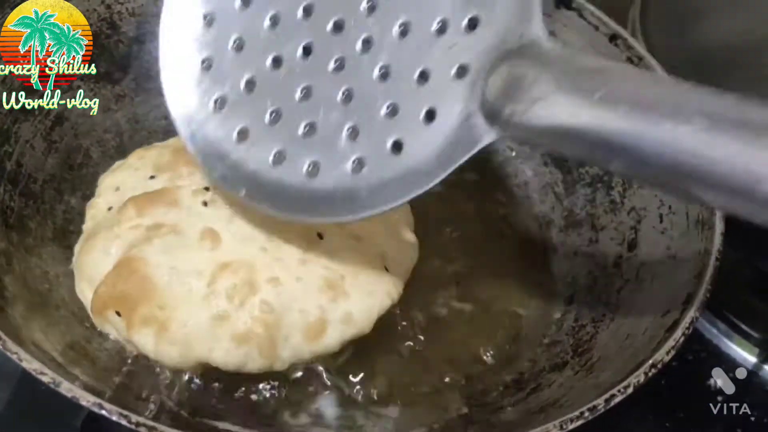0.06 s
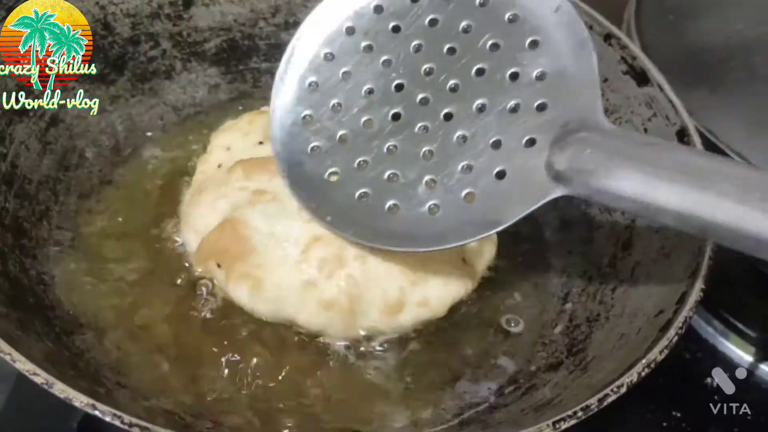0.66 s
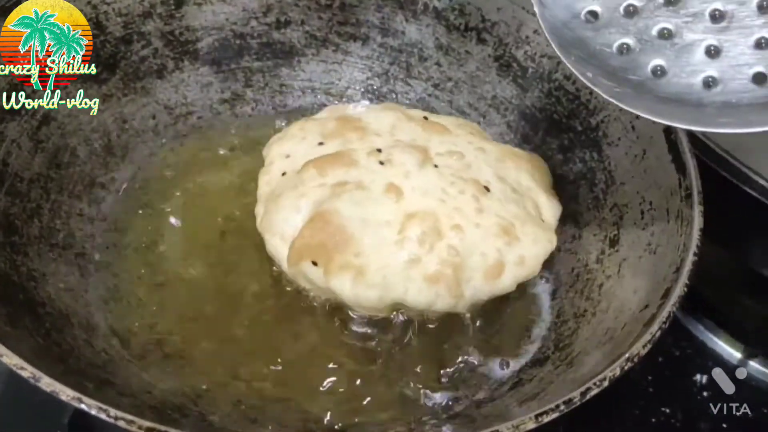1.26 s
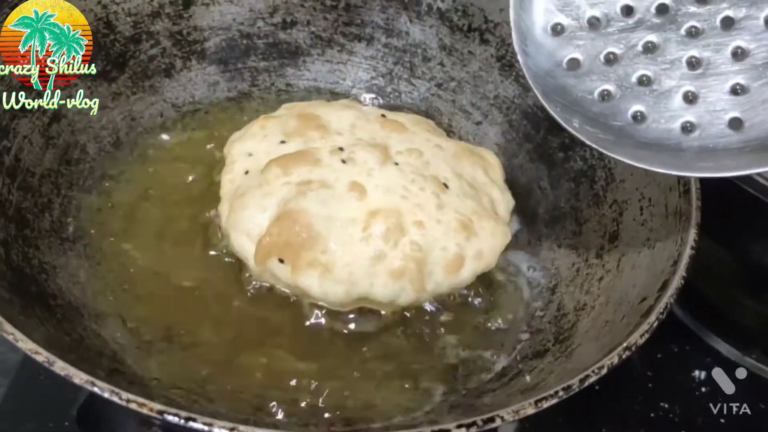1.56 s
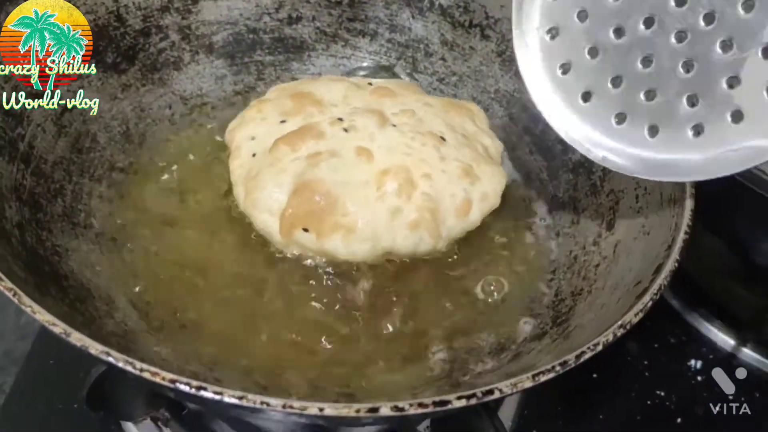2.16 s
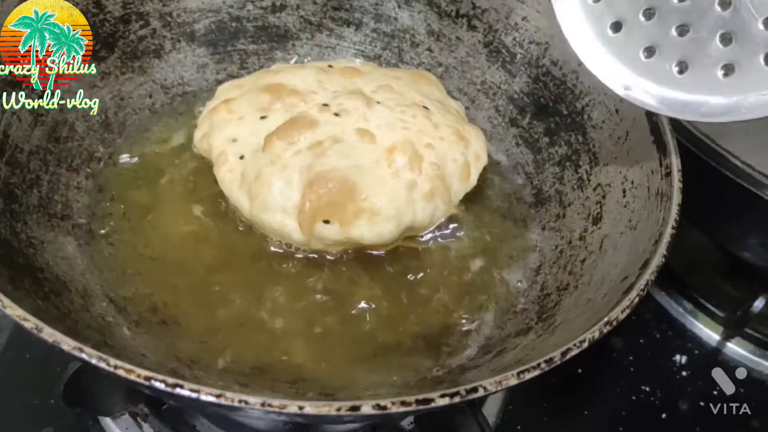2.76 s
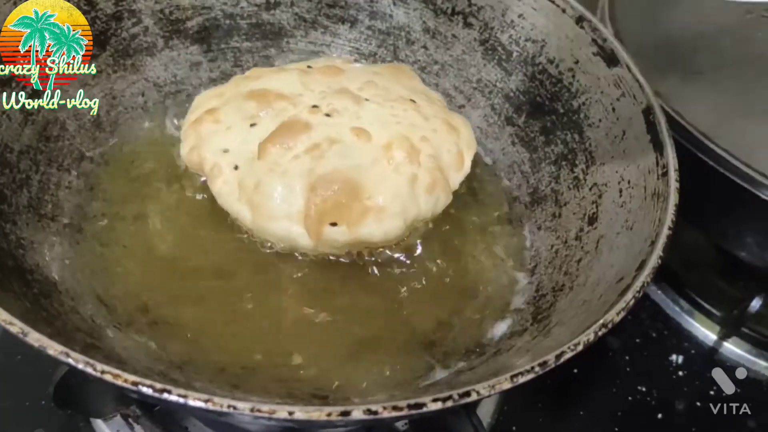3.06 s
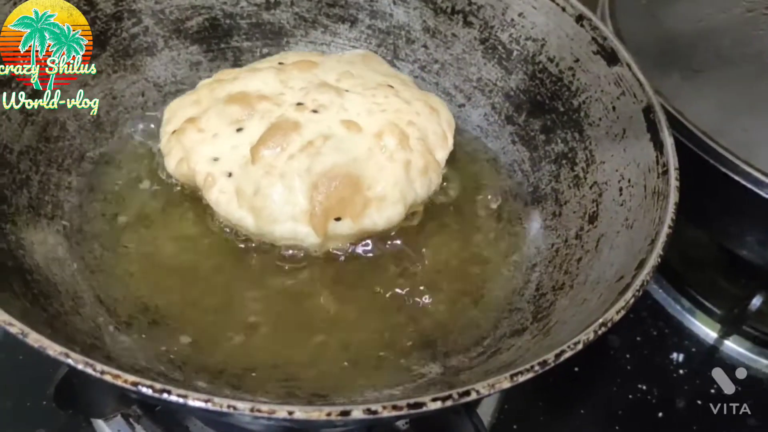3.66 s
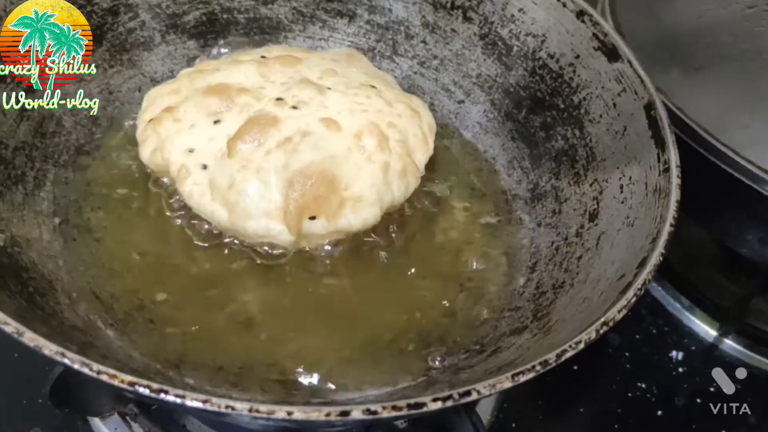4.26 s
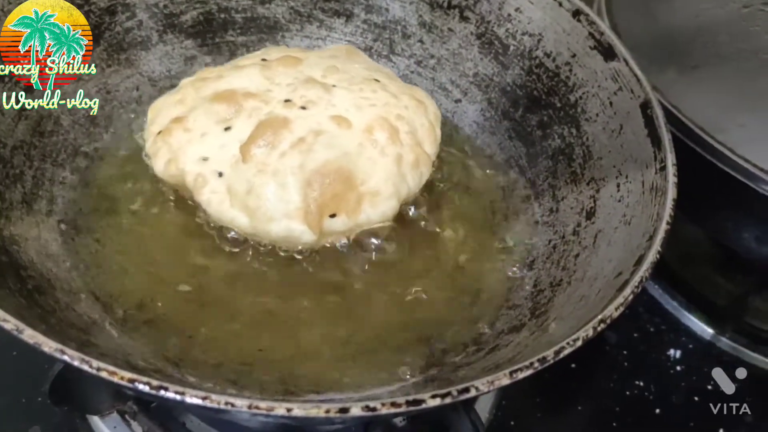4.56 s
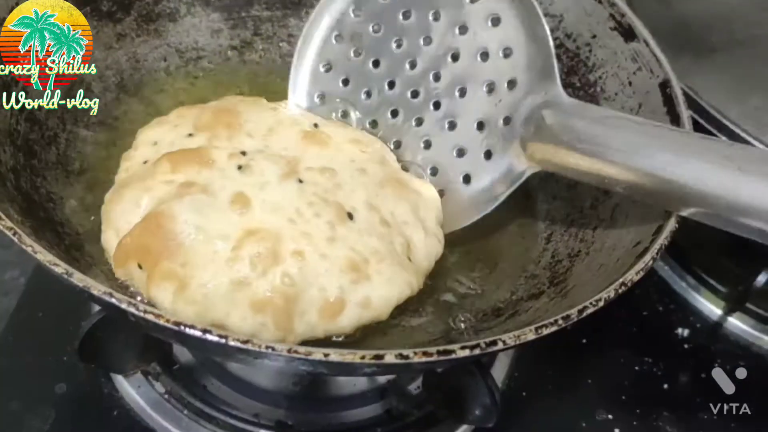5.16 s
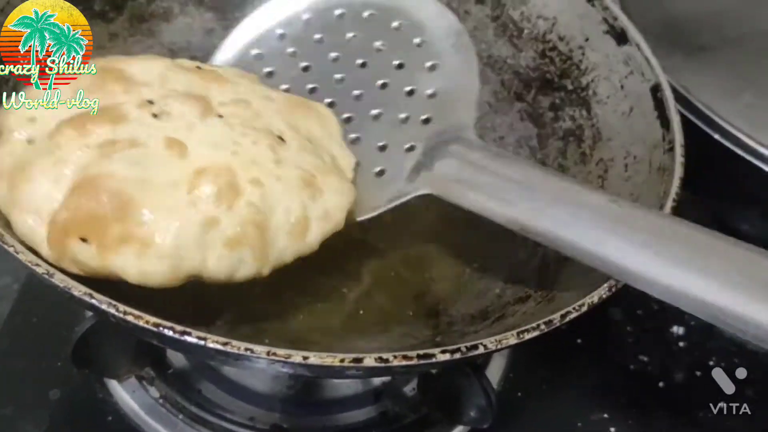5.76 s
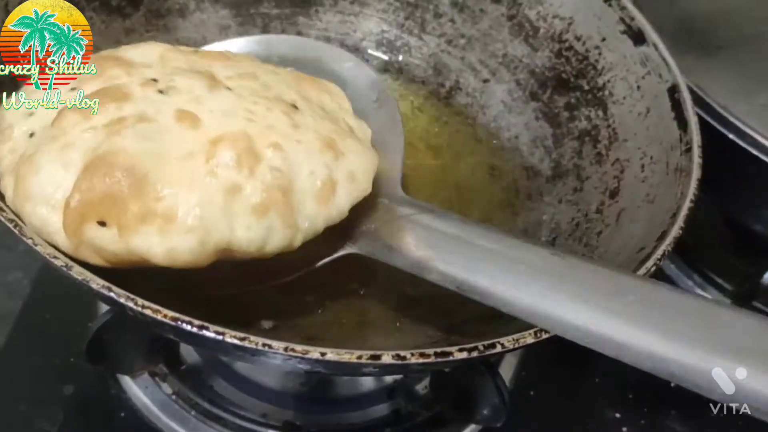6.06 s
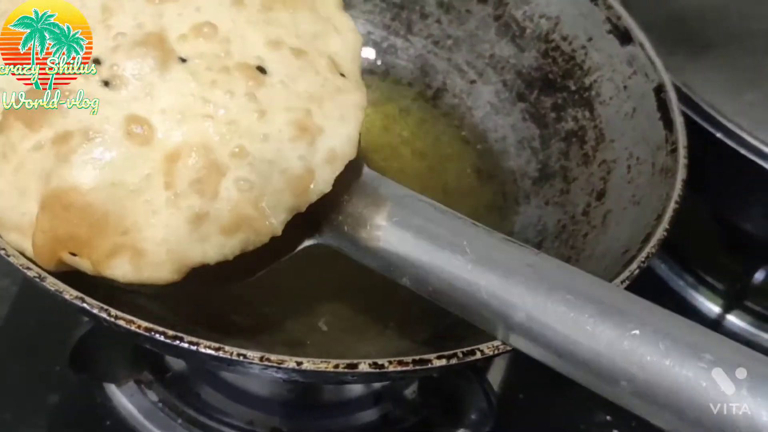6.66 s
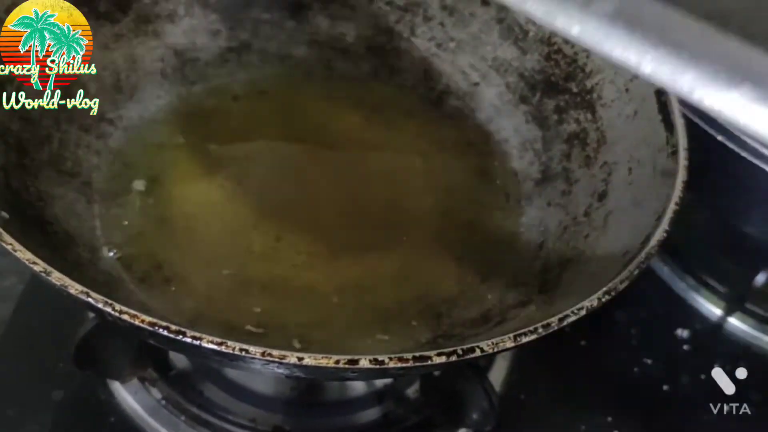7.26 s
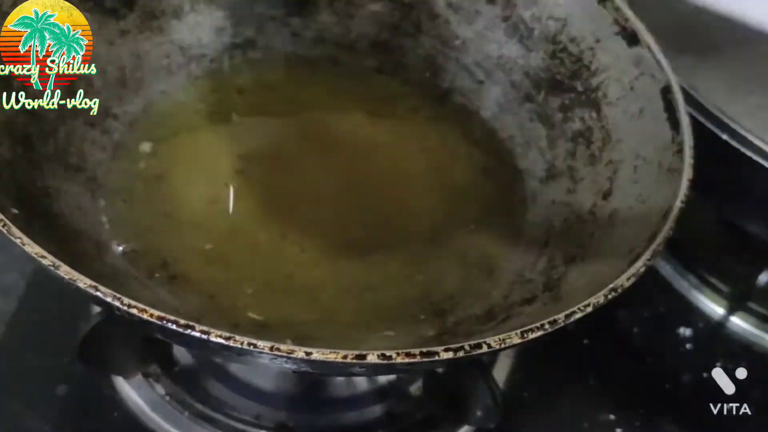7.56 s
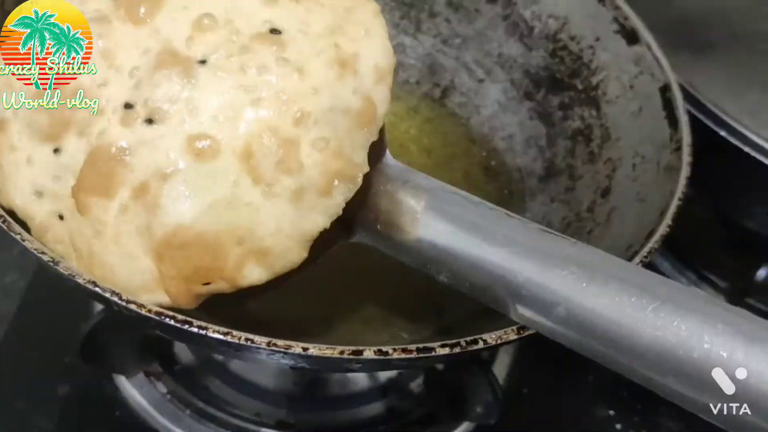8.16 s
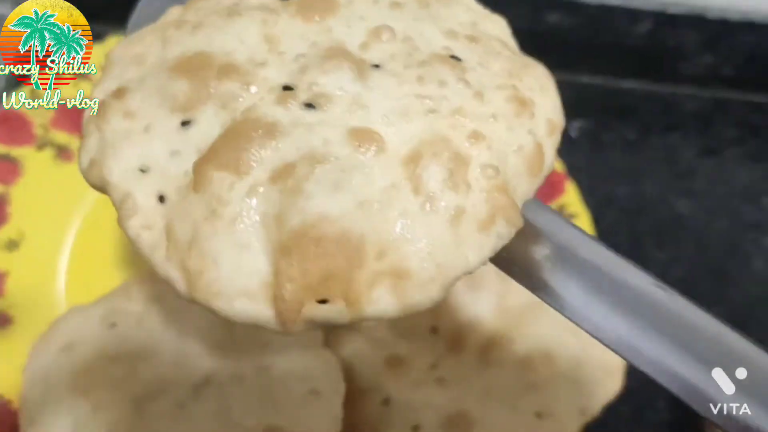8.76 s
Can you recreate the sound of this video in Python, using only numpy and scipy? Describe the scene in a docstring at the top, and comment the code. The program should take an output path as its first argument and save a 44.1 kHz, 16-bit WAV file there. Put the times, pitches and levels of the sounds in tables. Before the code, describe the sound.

Oil softly fizzes and spits over a low gas flame rumble, until a metal skimmer rattles against the pan, knocks twice and rings.

```python
"""A small kitchen, stereo microphone close to a steel pan on a gas stove, where a puffed round of dough fries.
The flame rumbles over the room's low hum. Steam leaves the dough as bubbles, so the oil fizzes, plops
and spits. A steel skimmer lifts the dough out and the sizzle thins, with two faint, sinking whistles.
The skimmer scrapes and rattles on the pan, knocks hard twice and rings on after the second blow.
The sound drops out briefly twice; at the end a low hum spreads wide."""
import sys
import numpy as np
from scipy import signal
from scipy.fft import rfft, irfft, next_fast_len
from scipy.io import wavfile
from scipy.ndimage import uniform_filter1d

SR = 44100
rng = np.random.default_rng(int(sys.argv[2]) if len(sys.argv) > 2 else 0)


def wav_record(signal):
    """Record a signal, one row per channel, as 16-bit PCM in the file named by sys.argv[1]."""
    frames = np.transpose(np.atleast_2d(signal))
    bounded = np.clip(frames, -1, 1)
    # unit amplitude maps onto the largest positive 16-bit level
    quanta = np.round(bounded * 32767).astype(np.int16)
    wavfile.write(sys.argv[1], SR, quanta)


N = 397782
TIME = np.arange(N) / SR
TAIL = TIME[:SR // 2]  # time within one short event

# Room tone, the kitchen's steady hum: f/Hz, density/dB
HUM_SPECTRUM = [(40, 4), (70, -10), (105, 5.5), (140, -14), (175, -4), (250, -19), (380, -14.5),
                (550, -23.5), (800, -22.5), (1100, -42), (2400, -32), (5000, -31), (9000, -35)]
# How hard the gas flame rumbles: t/s, level/dB
RUMBLE_LEVEL = [(0, -55.5), (1.4, -52), (2.85, -50.5), (3.1, -44), (4.25, -43.5), (4.95, -49.5),
                (5.12, -69), (7.9, -63), (9.02, -75)]
# The flame's deep rumble and its flutter: f/Hz, density/dB
RUMBLE_SPECTRUM = [(10, -4.5), (20, 3), (33, -5.5), (48, -15.5), (65, -18.5), (110, -21.5), (170, -33.5),
                   (260, -50), (500, -87)]
FLUTTER_SPECTRUM = [(90, -4), (180, 14.5), (260, -0.5), (370, 8.5), (450, -4), (540, 0.5), (800, -10),
                    (1200, -58), (2500, -25)]
# The oil's simmer, its fizz and the airy top of the fizz: f/Hz, density/dB
SIMMER_SPECTRUM = [(400, -6.5), (800, 4.5), (1100, -3.5), (1900, -2), (2900, -2), (4000, -2), (5500, -4),
                   (8000, -8.5), (14000, -28)]
FIZZ_SPECTRUM = [(1500, -25), (4500, -15), (6500, 0), (9000, 1), (11000, -1), (13000, -4), (15800, -18)]
AIR_SPECTRUM = [(5500, -23.5), (8500, -6.5), (11000, 0), (12700, 0), (14500, 0), (15800, -3)]
# Large bubbles bursting: t/s, peak/dB, f/Hz, rise/cycles
PLOPS = [(.047, -44.5, 2160, 0.49), (.253, -41, 1910, 0.9), (.252, -47, 3760, 1.7), (.334, -42, 1660, 1.1),
         (.466, -45, 1450, 0.61), (0.476, -39.5, 1970, 0.78), (.567, -46, 750, 0.46),
         (0.588, -45.5, 1880, 0.77), (.676, -40, 3360, 0.53), (0.817, -49, 2150, 1.2),
         (.993, -48, 1630, 1.5), (1.004, -45, 3830, 0.6), (1.039, -48.5, 3170, 1.4),
         (1.074, -47, 2400, 0.41), (1.247, -49, 3000, .5), (1.434, -53, 1110, 0.73),
         (1.389, -51, 1720, 1.6), (1.478, -51, 3300, 1.5), (1.508, -51, 3430, 1.1), (1.569, -58, 1700, 2),
         (1.666, -54.5, 1690, 2.2), (1.867, -51, 2150, 0.8), (2.140, -45, 1800, 2.4), (2.391, -54, 2200, 2),
         (2.445, -50, 2200, 1.1), (2.812, -53, 3280, 2.5), (3.222, -48, 1900, 0.91),
         (3.418, -55.5, 1750, 3.1), (3.4925, -40.5, 3930, 2.8), (3.834, -50, 1790, 1.2),
         (3.851, -53, 3600, 2.7), (4.253, -53.5, 1740, 1.6), (4.358, -50, 1600, 0.84),
         (4.438, -47.5, 3570, 2.2), (4.855, -38, 3040, 1.14), (4.853, -46, 1740, 1.2),
         (5.006, -53.5, 2410, 3.1), (5.14, -44.5, 3220, 1.5)]
# Droplets spat out of the oil: t/s, level/dB, f/Hz, rise/cycles, spatter t60/s
SPITS = [(.220, -60, 12400, 2, .02), (.268, -60, 12400, .7, .08), (.477, -55, 11300, 1, .09),
         (.565, -53.5, 7600, .7, .025), (.813, -60, 8000, .5, .04), (.911, -61, 7500, 2, .03),
         (1.005, -59, 5500, .6, .04), (1.145, -57.5, 9800, .9, .03), (1.238, -61, 6900, 1.5, .05),
         (1.461, -57, 6300, .5, .012), (1.528, -61, 9500, 1.8, .03), (1.569, -59.5, 11800, .7, .015),
         (2.544, -57.5, 10800, .8, .02), (2.635, -60, 7800, 1.6, .09), (2.720, -61, 11800, .8, .05),
         (2.8275, -48, 10900, 2.4, .025), (3.117, -62, 6720, 3, .03), (3.601, -62, 11800, 2, .03),
         (3.636, -52, 12000, .9, .025), (3.643, -58, 7500, .5, .08), (3.722, -54.5, 11000, .7, .05),
         (3.741, -57, 10900, .8, .06), (4.055, -63, 14500, 2, .02), (4.253, -59, 9400, 1, .02),
         (4.342, -51, 10400, .8, .05), (4.455, -63, 12500, .7, .08), (4.552, -59.5, 8500, .4, .015),
         (4.563, -60, 13000, 1, .012), (4.708, -59.5, 7500, .4, .11), (5.242, -54.5, 7500, .7, .03),
         (5.389, -54, 13000, .9, .015)]
# Runs of like-sized bubbles: start/s, end/s, f/Hz, level/dB
BUBBLE_STREAMS = [(0.424, 0.527, 5270, -68), (1.753, 2.273, 3830, -72.5), (2.09, 2.715, 4200, -74),
                  (3.256, 3.482, 3830, -75), (4.258, 4.328, 4860, -67), (5.196, 5.666, 2600, -74.5)]
# Faint whistles, perhaps steam leaving the dough: start/s, end/s, first f/Hz, last f/Hz, level/dB
WHISTLES = [(5.3, 6.36, 1870, 1740, -75.5), (7.194, 7.515, 1795, 1594, -80.5)]
# Skimmer dragged over the pan: t/s, length/s, grind/dB, judder/dB, tilt/(dB per octave)
SCRAPES = [(5.671, 0.038, -61.5, -70, 1), (5.802, 0.076, -52.5, -49.5, -1.5),
           (5.88, 0.13, -62.5, -60.5, -2), (6.111, .07, -59, -61, 0.5), (6.191, 0.091, -67, -61.5, 0.5),
           (6.268, 0.084, -58.5, -53.5, 3.5), (6.364, 0.12, -73, -68.5, -4.5),
           (6.46, 0.14, -69, -61.5, -3.5), (6.683, 0.15, -78, -69.5, -4), (6.981, 0.029, -62.5, -68, -2),
           (7.01, 0.054, -57, -56, -0.5), (7.055, 0.072, -61, -63, -2), (7.673, .05, -70.5, -90, 0),
           (7.844, 0.044, -43.5, -49.5, 1), (7.885, .065, -57.5, -62, -.5),
           (7.964, 0.054, -45.5, -48.5, -1.5)]
# Skimmer striking the pan: t/s, clank/dB, thud/dB, ring/dB, tilt/(dB per octave)
KNOCKS = [(5.804, -43.5, -43, -58, 1), (5.818, -46, -54, -68, 0), (5.840, -46.5, -54, -67, -4.5),
          (5.943, -55, -52.5, -61.5, -0.5), (6.0027, -59, -76, -68, 0), (6.1147, -59, -66, -63, 1),
          (6.140, -50, -51, -60, 2), (6.458, -57, -60, -72, -3.5), (6.9942, -52, -63, -75, -2),
          (7.0194, -53, -66, -82, 1.5), (7.073, -57.5, -66, -80, -2), (7.8365, -54.5, -46, -80, -1),
          (7.8611, -33.5, -43.5, -64, 0.9), (7.9579, -28, -49.5, -65, .5), (7.987, -42.5, -53.5, -78, 0),
          (8.011, -50, -54, -71, 0.5)]
# Steel on steel, the smooth base of the contact noise: f/Hz, density/dB
CONTACT_SPECTRUM = [(240, -15), (400, -11), (750, -12.5), (1300, -7.5), (2000, -25), (3000, -5.5),
                    (4000, -10), (4600, -15), (6640, -8.5), (13700, -19), (16000, -27)]
# Broad resonances of steel pressed on steel: f/Hz, width/Hz, level/dB
CONTACT_RESONANCES = [(780, 150, 2.5), (1140, 150, -5.5), (1570, 130, 1), (2240, 140, 1.5),
                      (2920, 280, -1.5), (3900, 330, -6.5), (5110, 150, 0), (6450, 110, 0.5),
                      (7220, 150, 0.5), (8260, 110, 2), (9470, 200, -2.5), (10800, 180, -4),
                      (12200, 150, -10), (13350, 180, -11)]
# Modes of the pan on its stand: f/Hz, level/dB, t60/s
PAN_MODES = [(100.2, -3.5, 0.244), (172, -7, 0.59), (193, 4, 0.09), (236.8, -1, 0.24), (271.5, 4, 0.075),
             (328.7, -2.5, 0.1), (376, -11, 0.2), (473, -15, 0.25), (653, -15.5, 0.41), (702, -7, 0.055)]
# Modes of the skimmer: f/Hz, free level/dB, free t60/s, level pressed on the pan/dB
SKIMMER_MODES = [(867, -31, .8, -12), (1365, -28, .3, -8), (1740, -33, .4, -1), (1954, -36, .7, -14),
                 (2645, -26, .4, 1), (2756, -26, .28, -8), (3379, -6, .33, -6), (4202, 4, .27, -3.5),
                 (4400, -30, .2, -3), (5088, -9, .24, -7), (6049, -5, .16, -12), (6459, -9, .2, -10),
                 (6738, -14, .23, -8), (7176, -13, .19, -9), (8165, -8, .15, -4), (8200, -8, .15, -7),
                 (12000, -16, .14, -10)]
# The free ring at the two microphone ports: f/Hz, left over right/dB, left lead/rad
RING_AT_MIC = [(2600, -3, 0), (3380, -15, -2.7), (4200, -3, -1.6), (5090, 3, -1.5), (6050, 9, .7),
               (8200, 0, 0)]
# The wide hum at the end: t/s, level/dB
WIDE_HUM_LEVEL = [(8.05, -101), (8.3, -64), (9.02, -71)]
# Stereo width of the stove and steel sounds, wide in the middle, narrow in the bass and top treble:
# f/Hz, side gain/dB
STOVE_WIDTH = [(60, -15), (250, -10), (640, -4.5), (1400, -0.5), (3100, 0), (6000, -2), (10000, -17.5),
               (15000, -12.5)]
STEEL_WIDTH = [(60, -17), (250, -14), (640, -4), (1400, 0), (3100, -0.5), (6000, -1), (10000, -10.5),
               (15000, -13)]
# How the same two lean to one side: f/Hz, leftward lean/dB
STOVE_LEAN = [(60, 4), (150, 0), (380, -0.5), (950, -1.5), (2380, -12.5), (5980, 0.5), (15000, -2.5)]
STEEL_LEAN = [(60, 4), (150, -1.5), (380, 2), (950, -0.5), (2380, -6), (5980, 4.5), (15000, -3)]
# The sound drops out and returns a little louder: start/s, end/s, surge length/s, surge/dB
DROPOUTS = [(4.871, 4.93, 0.035, 2), (8.207, 8.243, 0.042, 2.5)]

# The dough is lifted and drains, and late on the sizzle fades: start/s, length/s
LIFT, DRAIN, FADE = (5.05, 0.27), (4.91, 2.53), (8.1, 0.29)
CONTACT_DETUNE, CONTACT_SPREAD_DB = 0.012, 2  # scatter per contact: share of pitch, mode strength


def amp(db):
    """Decibels to gain."""
    return 10 ** (np.asarray(db) / 20)


def unit_rms(x):
    """Scales to an rms of one."""
    return x / np.sqrt(np.mean(x ** 2) + 1e-20)


def curve(rows):
    """Joins (time, value) points over the whole scene."""
    return np.interp(TIME, *np.transpose(rows))


def progress(start, length):
    """Rises from 0 to 1 over a stretch of time."""
    return np.clip((TIME - start) / length, 0, 1)


def arch(start, end):
    """Swells and stops again."""
    return np.sqrt(abs(np.sin(np.pi * progress(start, end - start))))


def add(mix, start, sound):
    """Mixes a sound in at a time."""
    part = mix[round(start * SR):][:len(sound)]
    part += sound[:len(part)]


def through(x, response):
    """Convolves with an impulse response."""
    return signal.oaconvolve(x, response)[:N]


def colour(x, points):
    """Filters by a spectrum of (Hz, dB) points."""
    hz, db = np.transpose(points)
    size = next_fast_len(len(x) + 2048)
    bins = np.fft.rfftfreq(size, 1 / SR)
    gain = amp(np.interp(np.log(bins + 1), np.log(hz), db))
    return irfft(rfft(x, size) * gain, size)[:len(x)]


def noise(spectrum):
    """Coloured noise at unit rms."""
    return unit_rms(colour(rng.standard_normal(N), spectrum))


def echoes(t60):
    """Dense dying reflections off nearby surfaces, favouring no pitch; unit energy."""
    envelope = amp(-60 * TAIL / t60) * (1 - np.exp(-TAIL / 0.0011))
    spectrum = rfft(rng.standard_normal(len(TAIL)) * envelope)
    local_power = uniform_filter1d(abs(spectrum) ** 2, size=60)
    tail = irfft(spectrum / np.sqrt(local_power), len(TAIL)) * (TAIL < t60)
    return tail / np.linalg.norm(tail)


def gas_flame():
    """The burner under the pan: a deep rumble, and a softer flutter that follows its level."""
    rumble = noise(RUMBLE_SPECTRUM)
    flutter = amp(-21.5) * noise(FLUTTER_SPECTRUM)
    return (rumble + flutter) * amp(curve(RUMBLE_LEVEL))


def room_tone():
    """The kitchen hums steadily; a 120 Hz tone swells once, briefly."""
    swell = arch(start=0.53, end=1.27) * unit_rms(np.sin(2 * np.pi * 120 * TIME))
    return amp(-67) * noise(HUM_SPECTRUM) + amp(-66) * swell


def clicks(per_s, spread_db, size=N):
    """Random clicks, most small and a few large."""
    strength = amp(spread_db * np.minimum(rng.exponential(1, size), 5))
    return strength * rng.choice([-1, 1], size) * (rng.random(size) < per_s / SR)


def bubble(hz, cycles):
    """A bursting cavity: its tone peaks after the given cycles and dies within a few more."""
    turns = hz * TAIL[:1024]
    return turns / cycles * np.exp(1 - turns / cycles) * np.sin(2 * np.pi * turns)


def spray(x, seconds):
    """Every click trails off in a short puff of noise."""
    decay = np.exp(-1 / (seconds * SR))
    return np.sqrt(signal.lfilter([1 - decay], [1, -decay], x ** 2)) * rng.standard_normal(N)


def clumped(x, depth_db):
    """Bubbles come in clumps of like size, so narrow bands swell and fade."""
    bands = signal.stft(x, nperseg=512)[2]
    across_pitch = uniform_filter1d(rng.standard_normal(bands.shape), size=9, axis=0)
    clumps = unit_rms(uniform_filter1d(across_pitch, size=10, axis=1))
    return unit_rms(signal.istft(bands * amp(depth_db * clumps))[1][:N])


def prickle():
    """Pinprick bubbles burst in tiny clusters, each cluster at one pitch."""
    out = np.zeros(N)
    for hz in np.geomspace(5500, 14500, 9):
        clusters = spray(clicks(per_s=60, spread_db=3.7), seconds=.002)
        out += unit_rms(through(clusters, bubble(hz, cycles=1.2)))
    return unit_rms(out)


def frying(db, settle_db_per_s, lift_db, drain_db, fade_db, surge_db):
    """Gain of a sizzle layer: it surges at random, settles in the oil, shifts as the dough is lifted and
    drains, and fades late on."""
    surges = noise([(1, 0), (7, 0), (20, -40), (60, -120)])
    settled_db = settle_db_per_s * np.minimum(TIME, LIFT[0])
    moves_db = lift_db * progress(*LIFT) + drain_db * progress(*DRAIN) + fade_db * progress(*FADE)
    return amp(db - settled_db + moves_db + surge_db * surges)


def sizzle():
    """Steam escapes the dough in swarms of small bubbles; the finest merge into fizz."""
    swarm = sum(through(clicks(per_s=64, spread_db=3.5), bubble(hz, cycles=0.42)) * np.sqrt(hz)
                for hz in np.geomspace(1300, 5000, 10))
    swarm = unit_rms(swarm + 1.2 * through(swarm, echoes(t60=0.04)))
    simmer = clumped(noise(SIMMER_SPECTRUM), depth_db=3.5)
    ticks = clicks(per_s=1000, spread_db=4)
    crackle = unit_rms(ticks + 1.95 * spray(ticks, seconds=0.009)) + amp(-3.5) * prickle()
    fizz = clumped(colour(crackle, FIZZ_SPECTRUM), depth_db=1.5)
    fizz *= frying(db=-72, settle_db_per_s=0.88, lift_db=2, drain_db=-3.5, fade_db=0, surge_db=-0.2)
    air = clumped(colour(crackle, AIR_SPECTRUM), depth_db=0.5)
    air *= frying(db=-77.5, settle_db_per_s=1.4, lift_db=10.5, drain_db=4, fade_db=-10, surge_db=0.1)
    boil = amp(-4) * swarm + amp(-1.5) * simmer
    boil *= frying(db=-67, settle_db_per_s=0.355, lift_db=3, drain_db=-13, fade_db=-1.5, surge_db=0.65)
    return boil + fizz + air


def plop(db, hz, cycles):
    """One bubble bursts, and seven weaker ones of other sizes splutter within 13 ms."""
    splutter = amp(-15 + .6 * (db + 47))  # violent plops splutter more
    out = np.zeros(len(TAIL))
    add(out, 0, bubble(hz, cycles))
    for delay, pitch, strength in rng.random((7, 3)):
        weaker = splutter * (.5 + strength) * bubble(hz * 2.3 ** (pitch - .5), .7 * cycles)
        add(out, .013 * delay, weaker)
    return amp(db) * out


def spit(db, hz, cycles, t60, fragments_per_s=6000):
    """A droplet snaps and shatters into a dying spatter."""
    fragments = rng.standard_normal(len(TAIL)) * (rng.random(len(TAIL)) < fragments_per_s / SR)
    spatter = fragments * amp(-60 * TAIL / t60)
    spatter[0] = 1  # the first snap
    sound = through(spatter, bubble(hz, cycles))
    return amp(db) * sound / np.sqrt(2 * np.mean(sound[:220] ** 2))


def strays(count, **ranges):
    """Random events until the dough is lifted: rows of a time and a value from each range, in order."""
    draw = rng.random((count, 1 + len(ranges)))
    low, high = np.transpose(list(ranges.values()))
    times = (np.arange(count) + draw[:, 0]) / count * LIFT[0]
    return list(np.column_stack([times, low + (high - low) * draw[:, 1:]]))


def plops_and_spits():
    """Bubbles plop and droplets tick; the pan wall throws back the plops, the kitchen both."""
    plops, spits = np.zeros(N), np.zeros(N)
    for start, *cavity in PLOPS + strays(16, db=(-60, -54), hz=(1600, 3800), cycles=(1, 2.2)):
        add(plops, start, plop(*cavity))
    small_spits = strays(36, db=(-70, -63), hz=(4500, 14000), cycles=(.4, 2), t60=(.008, .04))
    for start, *droplet in SPITS + small_spits:
        add(spits, start, spit(*droplet))
    pan_wall = .25 * np.roll(plops, round(.0043 * SR))
    room = through(.4 * plops + .45 * spits, echoes(t60=.13))
    return plops + pan_wall + spits + room


def bubble_streams():
    """A leak in the crust blows a run of bubbles of one size."""
    out = np.zeros(N)
    for start, end, hz, db in BUBBLE_STREAMS:
        run = through(clicks(per_s=1400, spread_db=4.5), bubble(hz, cycles=0.98))
        out += amp(db) * arch(start, end) * unit_rms(run)
    return out


def whistles():
    """Thin tones that waver and sink, perhaps steam leaving the dough."""
    waver = 1 + 0.0181 * unit_rms(uniform_filter1d(rng.standard_normal(N), size=200))
    out = np.zeros(N)
    for start, end, first_hz, last_hz, db in WHISTLES:
        turns = np.cumsum(curve([(start, first_hz), (end, last_hz)]) * waver) / SR
        out += amp(db) * arch(start, end) * unit_rms(np.sin(2 * np.pi * turns))
    return out


def partials(modes):
    """One dying sine for each mode."""
    return np.array([amp(db - 60 * TAIL / t60) * np.sin(2 * np.pi * (hz * TAIL + rng.random()))
                     for hz, db, t60 in modes])


def struck(bank):
    """Each point of contact wakes the modes in its own proportions; starts at unit level."""
    weights = amp(CONTACT_SPREAD_DB * rng.standard_normal(len(bank))) * rng.choice([-1, 1], len(bank))
    sound = weights @ bank
    return sound / np.std(sound[:400])


def driven(force, response):
    """A force played through a response of unit energy."""
    return through(force, response / np.linalg.norm(response))


def steel_contact(impact, thicket, tilt_db):
    """An impact and its short modes, through broad resonances that shift with the point of contact."""
    contact = impact + amp(-18) * struck(thicket)
    hz = np.geomspace(200, 17000, 900)
    shifts = 1 + CONTACT_DETUNE * rng.standard_normal(len(CONTACT_RESONANCES))
    peaks = sum(amp(db) ** 2 / (1 + (2 * (hz - centre * shift) / width) ** 2)
                for (centre, width, db), shift in zip(CONTACT_RESONANCES, shifts))
    base_hz, base_db = np.transpose(CONTACT_SPECTRUM)
    base = amp(np.interp(np.log(hz), np.log(base_hz), base_db)) ** 2
    gain_db = 10 * np.log10(peaks + base) + tilt_db * np.log2(hz / 4000)
    return colour(contact, np.transpose([hz, gain_db]))


def pan_ring():
    """The pan's low modes, shifted a little by the skimmer's weight."""
    modes = [(hz * (1 + CONTACT_DETUNE * rng.standard_normal()), db, t60) for hz, db, t60 in PAN_MODES]
    return partials(modes).sum(0)


def scrape(thicket, held, length, grind_db, judder_db, tilt_db):
    """Gritty slips swell and ease off; steel, pan and skimmer ring on after them."""
    stroke = np.sqrt(abs(np.sin(np.pi * np.minimum(TAIL / length, 1))))
    slips = stroke * unit_rms(clicks(per_s=1600, spread_db=2.8, size=len(TAIL)))
    tick = rng.standard_normal(len(TAIL)) * amp(-60 * TAIL / 0.0073)
    grind = driven(slips, steel_contact(tick, thicket, tilt_db))
    grind += amp(-19) * driven(slips, struck(held))
    # light slips hardly rock the pan's lowest mode
    judder = driven(slips, colour(pan_ring(), [(100, -9.5), (220, -2)]))
    return amp(grind_db) * grind + amp(judder_db) * judder


def knock(thicket, held, clank_db, thud_db, ring_db, tilt_db):
    """Steel chatters in contact and dies into short modes; the pan thuds, the held skimmer rings."""
    chatter_s, crack_t60 = 0.0037, 0.048
    crack = rng.standard_normal(len(TAIL)) * amp(-60 * np.maximum(TAIL - chatter_s, 0) / crack_t60)
    clank = steel_contact(crack, thicket, tilt_db)
    clank /= np.std(clank[:200])
    thud = pan_ring() * (1 - np.exp(-TAIL / 0.0052))
    return amp(clank_db) * clank + amp(thud_db) * thud + amp(ring_db) * struck(held)


def skimmer_on_pan():
    """Blows and scrapes wake a thicket of short steel modes and those of the held skimmer."""
    thicket = partials([(hz, 0, 0.16 * (hz / 3000) ** -.1) for hz in rng.uniform(400, 16000, size=500)])
    held = partials([(hz, db, min(1.5 * t60, .42)) for hz, _, t60, db in SKIMMER_MODES])
    out = np.zeros(N)
    for start, *blow in KNOCKS:
        add(out, start, knock(thicket, held, *blow))
    for start, *drag in SCRAPES:
        add(out, start, scrape(thicket, held, *drag))
    return out


def free_ring(start, db, build_s):
    """The skimmer springs free and rings, each mode reaching the microphone from its own direction."""
    mic_hz, balances_db, leads = np.transpose(RING_AT_MIC)
    out = np.zeros((2, N))
    for hz, mode_db, t60, _ in SKIMMER_MODES:
        envelope = amp(db + mode_db - 60 * TAIL / t60) * (1 - np.exp(-TAIL / build_s))
        phase = 2 * np.pi * (hz * TAIL + rng.random())
        balance_db = np.interp(hz, mic_hz, balances_db)
        lead = np.interp(hz, mic_hz, leads)
        for channel, side in zip(out, (.5, -.5)):
            add(channel, start, amp(side * balance_db) * envelope * np.sin(phase + side * lead))
    return out


def wide_hum():
    """The kitchen's hum spreads wide at the end, opposite in phase left and right."""
    return np.outer([1, -1], noise(HUM_SPECTRUM) * amp(curve(WIDE_HUM_LEVEL)))


def stereo(direct, scattered, width, lean):
    """Scattered sound differs between the channels; the direct sound leans to one side."""
    left = colour(direct, [(hz, db / 2) for hz, db in lean])
    right = colour(direct, [(hz, -db / 2) for hz, db in lean])
    side = .9 * colour(scattered, width) + .35 * (left - right)
    return np.array([direct + side, direct - side])


def scene():
    """Flame, room, oil and skimmer from close by, scattered by the stove top and the walls."""
    oil_events = bubble_streams() + plops_and_spits() + whistles()
    steel = skimmer_on_pan()
    walls = echoes(t60=.04)
    direct = gas_flame() + room_tone() + sizzle() + oil_events
    # the sizzle comes from all over the pan, so the side signal gets noise of its own
    scattered = gas_flame() + room_tone() + sizzle() + through(oil_events, walls)
    stove = stereo(direct, scattered, STOVE_WIDTH, STOVE_LEAN)
    skimmer = stereo(steel, through(steel, walls), STEEL_WIDTH, STEEL_LEAN)
    return stove + wide_hum() + skimmer + free_ring(start=7.9585, db=-30.5, build_s=0.026)


def record(dry):
    """The sound drops out briefly twice and is cut off above 15.9 kHz."""
    gate = np.ones(N)
    for start, end, surge_s, surge_db in DROPOUTS:
        gate[(TIME > start) & (TIME < end)] = amp(-37)
        gate[(TIME > end) & (TIME < end + surge_s)] = amp(surge_db)
    gated = dry * uniform_filter1d(gate, size=130)
    lowpass = signal.firwin(511, 15900, window=("kaiser", 9), fs=SR)
    return signal.oaconvolve(gated, lowpass[None], "same")


dry = scene()
out = record(dry)
wav_record(out)
```